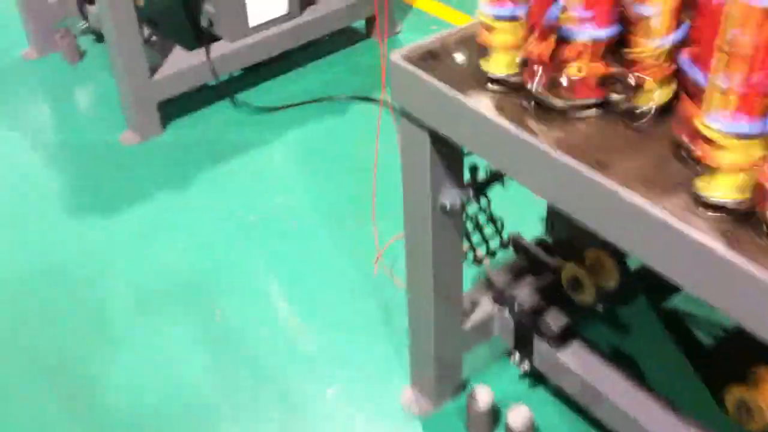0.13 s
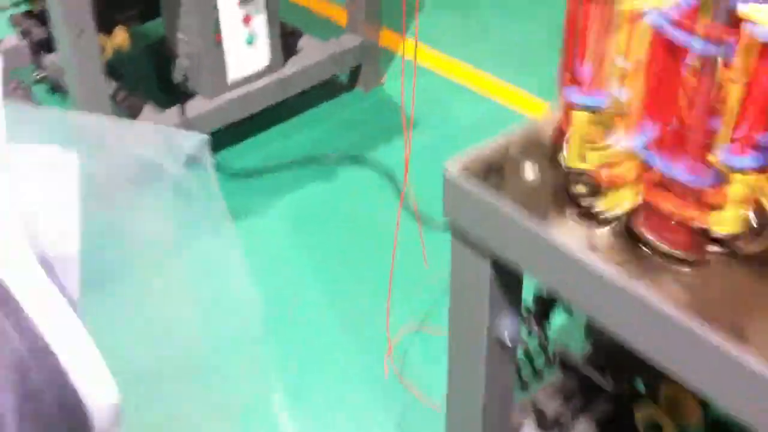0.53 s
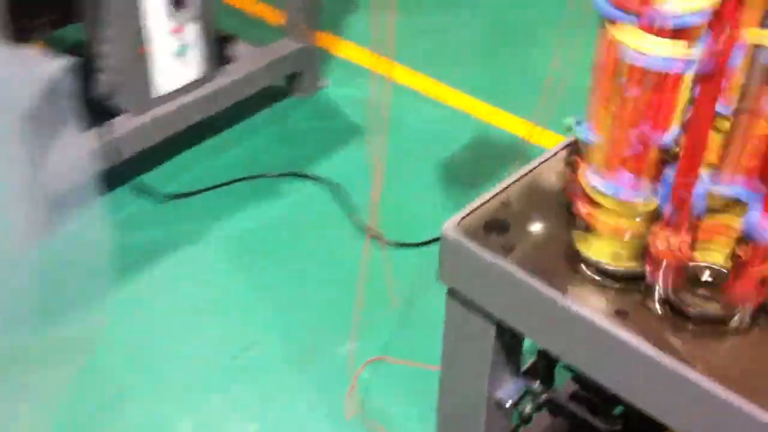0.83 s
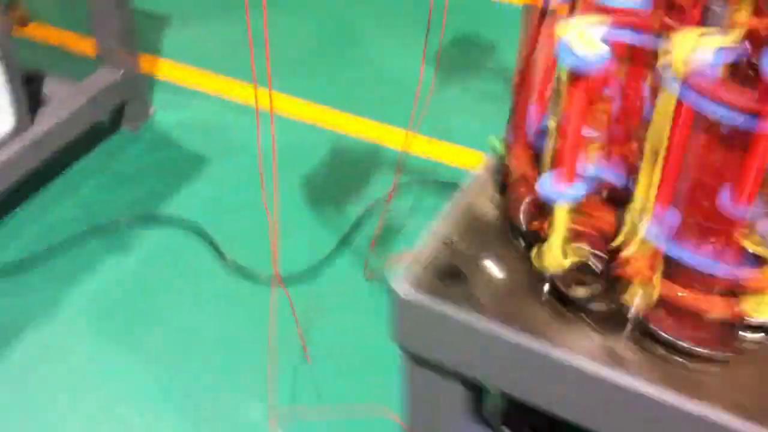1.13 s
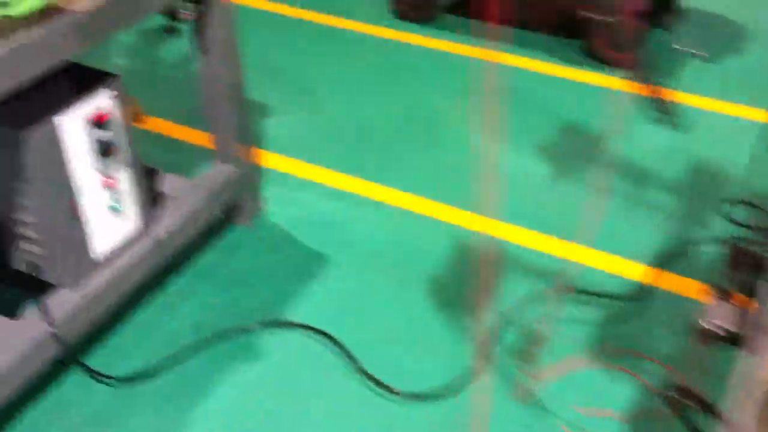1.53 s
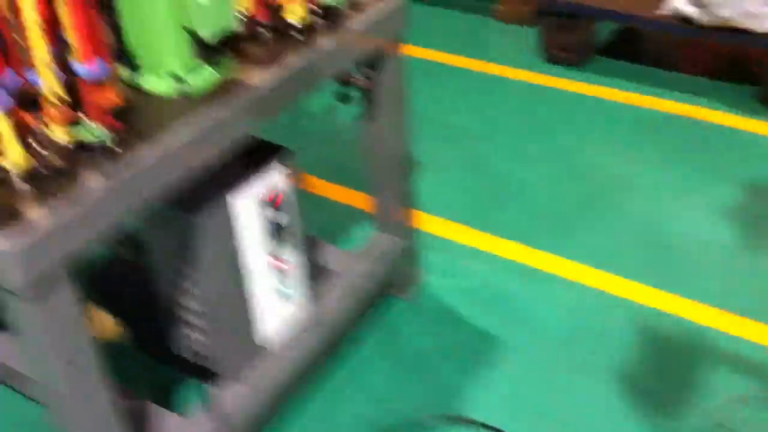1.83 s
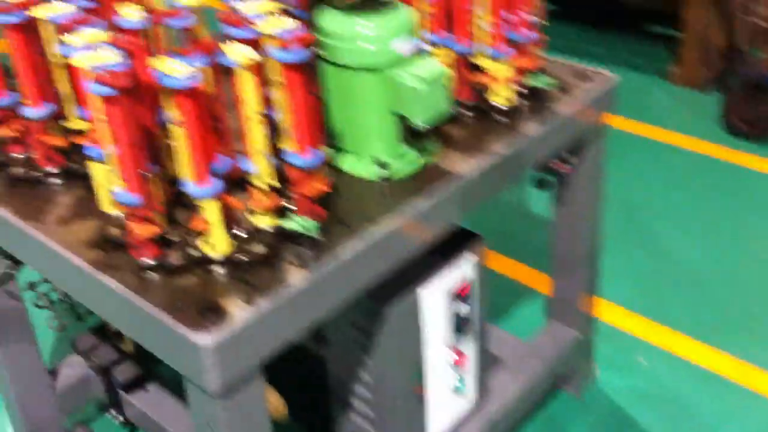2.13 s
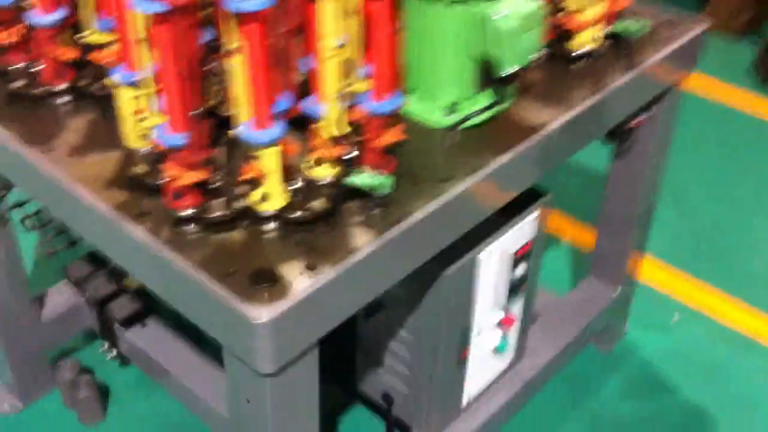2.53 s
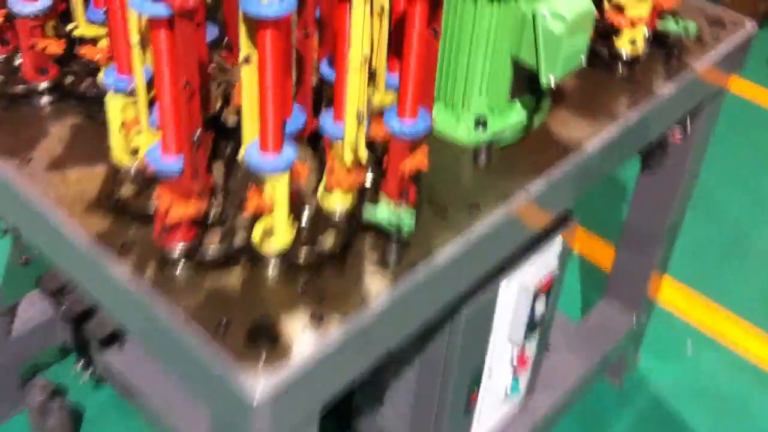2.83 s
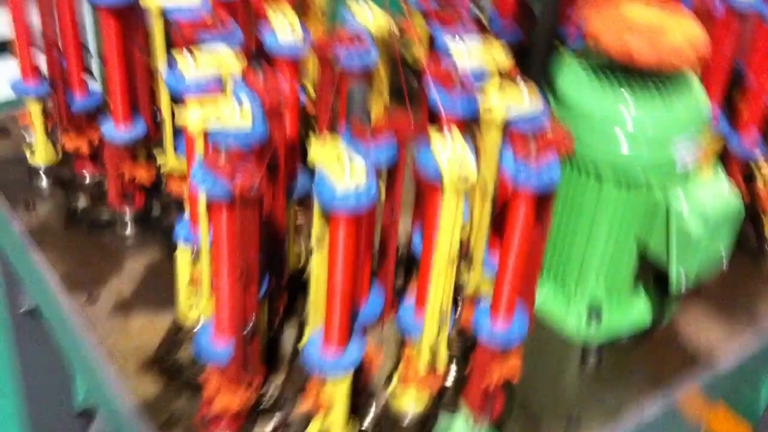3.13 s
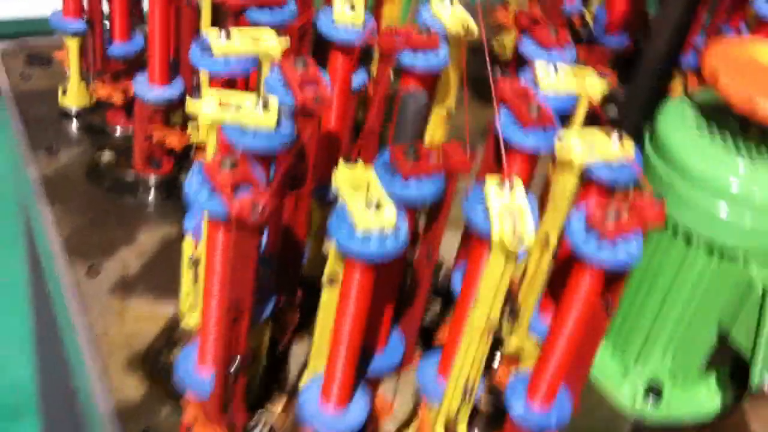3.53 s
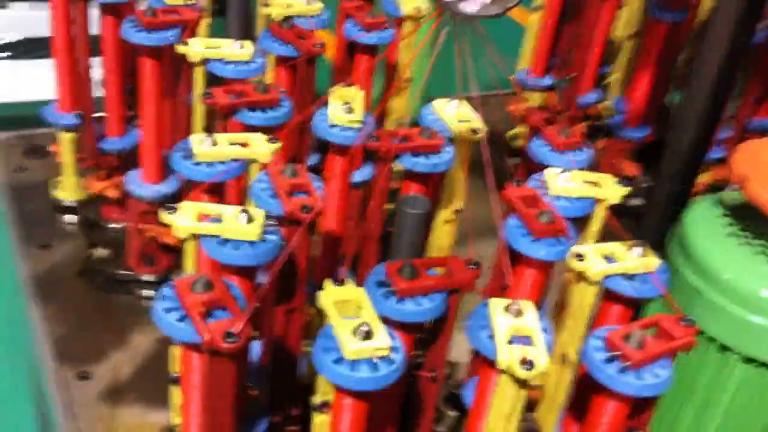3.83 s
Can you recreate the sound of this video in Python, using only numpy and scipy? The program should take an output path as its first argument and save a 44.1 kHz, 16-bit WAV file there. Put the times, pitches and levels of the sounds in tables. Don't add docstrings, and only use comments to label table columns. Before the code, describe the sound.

Braiding machine clatters loudly, stops at 1.5 seconds, leaving a quiet hall with scattered ticks

```python
import sys
import numpy as np
from scipy import signal
from scipy.fft import rfft, irfft
from scipy.io import wavfile

SR = 44100
rng = np.random.default_rng(int(sys.argv[2]) if len(sys.argv) > 2 else 0)


def magnitude_from_level(level_db):
    exponent = np.asarray(level_db, float) / 20
    return 10 ** exponent


def wav_record(signal):
    frames = np.transpose(np.atleast_2d(signal))
    bounded = np.clip(frames, -1, 1)
    quanta = np.round(bounded * 32767).astype(np.int16)
    wavfile.write(sys.argv[1], SR, quanta)


N = 176400
STOP_S = 1.5


def rms_one(x):
    return x / np.sqrt(np.mean(x ** 2) + 1e-20)


def curve(rows):
    rows = np.array(rows)
    return np.interp(np.arange(N) / SR, rows[:, 0], rows[:, -1])


def filtered(x, order, hz, kind):
    return signal.sosfilt(signal.butter(order, hz, kind, fs=SR, output="sos"), x)


def colour(x, points, peaks=()):
    hz = np.maximum(np.fft.rfftfreq(len(x), 1 / SR), 1)
    points = np.array(points)
    db = np.interp(np.log(hz), np.log(points[:, 0]), points[:, 1])
    for peak_hz, width_hz, peak_db in peaks:
        db = db + peak_db / (1 + (2 * (hz - peak_hz) / width_hz) ** 2)
    return rms_one(irfft(rfft(x) * magnitude_from_level(db), len(x)))


def drift(rate_hz):
    r = np.exp(-80 * np.pi * rate_hz / SR)
    noise = rng.standard_normal(N // 40 + 2002)
    slow = signal.lfilter([1], [1, -2 * r, r * r], noise)[2000:]
    return np.interp(np.arange(N) / 40, np.arange(len(slow)), rms_one(slow))


def sparse(length, rate_per_s):
    return (rng.random(length) < rate_per_s / SR) * rng.standard_normal(length)


def ring(clicks, hz, t60_s):
    r = magnitude_from_level(-60 / (t60_s * SR))
    w = 2 * np.pi * min(hz, .45 * SR) / SR
    return signal.lfilter([0, np.sin(w)], [1, -2 * r * np.cos(w), r * r], clicks + 1e-18)


def add(out, s, x):
    i = int(s * SR)
    out[i:i + len(x)] += x[:N - i]


def braider():
    # (time [s], level [dB])
    run = [(0, -22), (.4, -21.5), (.85, -19.5), (1.2, -18.5), (1.46, -19), (1.6, -25), (1.75, -30),
           (1.9, -39.5), (2.05, -49), (2.3, -60)]
    # (time [s], level [dB])
    drone = [(0, -1), (.15, 1), (.25, -2), (.55, -1), (.65, 1), (.8, 1), (.85, -1), (.9, 2), (1.1, 0),
             (1.26, -1), (1.4, 2), (1.54, 2), (1.575, -4), (1.61, 6), (1.66, 4), (1.69, -4), (1.72, 2),
             (1.86, -8)]
    slowing_per_s = 1.2
    after_s = np.maximum(np.arange(N) / SR - STOP_S, 0)
    speed = np.clip(1 - slowing_per_s * after_s, .05, 1)
    drone_db = curve(drone)
    out = coasting_treble(deck_clatter(speed), after_s)
    hum = filtered(out, 1, [180, 380], "band")
    out = out - hum * (1 - magnitude_from_level(drone_db))
    out += gear_tones(speed, after_s, drone_db)
    return out * magnitude_from_level(curve(run + [(2.8, -90)]))


def deck_clatter(speed):
    # (frequency [Hz], density [dB per Hz])
    clatter = [(35, -80), (60, -53.5), (200, -14), (255, -4), (537, -15), (837, -13), (1130, -15),
               (8420, -18), (15800, -29)]
    # (frequency [Hz], width [Hz], gain [dB])
    body = [(158, 45, 11), (280, 110, 4), (700, 184, 4), (1700, 430, 2.5), (2470, 260, 3), (3814, 450, 5),
            (5460, 1400, 3), (8700, 1300, 2)]
    knock_db, rattle_db, ping_db = -7, -4, -8.5
    wash = magnitude_from_level(knock_db) * speed ** 2 * carrier_knocks(speed)
    wash += magnitude_from_level(rattle_db) * rms_one(sparse(N, 2500))
    wash += magnitude_from_level(ping_db) * pings()
    wash += rng.standard_normal(N)
    swell_db = .5 * drift(4.8)
    return magnitude_from_level(3.5 + swell_db) * colour(wash, clatter, body)


def carrier_knocks(speed):
    # (share of the pass [0..1], level [dB])
    contacts = [(0, 3), (.25, 0), (.5, 0), (.75, 0), (.02, 2), (.22, -1), (.42, -1), (.62, -1), (.82, -1)]
    turn_hz, knock_s, spread_db, jitter_turns = 22.63, .002, 3, .006
    turns = np.cumsum(turn_hz * speed / SR)
    hits = np.zeros(N)
    draw = rng.standard_normal((100, len(contacts), 2))
    for k, (share, db) in enumerate(contacts):
        at = np.searchsorted(turns, np.arange(100) + share + jitter_turns * draw[:, k, 0])
        hits[np.minimum(at, N - 1)] = magnitude_from_level(db + spread_db * np.clip(draw[:, k, 1], -2, 1.3))
    decay = np.exp(-1 / (knock_s * SR))
    return rms_one(signal.lfilter([1], [1, -decay], hits) * rng.standard_normal(N))


def pings():
    taps_per_s, ring_cycles = 900, 104
    taps = sparse(N, taps_per_s)
    pitches_hz = 700 * 22 ** rng.random(40)
    dealt = rng.integers(0, 40, N)
    out = np.zeros(N)
    for k, hz in enumerate(pitches_hz):
        out += ring(taps * (dealt == k), hz, ring_cycles / hz) * np.sqrt(hz)
    return rms_one(out)


def coasting_treble(x, after_s):
    # (time [s], level over the clatter [dB])
    clanks = [
        (1.544, 4),
        (1.59, 6.5),
        (1.675, 8.5),
        (1.75, 7),
        (1.825, 2),
    ]
    fade_db_per_s, clank_s = 11.5, .012
    t = np.arange(N) / SR
    clank_db = sum(db * np.exp(-np.abs(t - s) / clank_s) * (t > s) for s, db in clanks)
    treble = x - filtered(x, 1, 3000, "low")
    return x - treble * (1 - magnitude_from_level(-fade_db_per_s * np.minimum(after_s, .5) + clank_db))


def gear_tones(speed, after_s, drone_db):
    tone_hz = [203.6, 248.5, 283, 849, 955]
    # (level re clatter [dB], wander [Hz])
    tones = [(-17, 1.0), (-5, 2.8), (-9.5, 8.0), (-12, 2.0), (-19.5, 2.0)]
    fade_db_per_s = 37
    out = np.zeros(N)
    for hz, (db, wander_hz) in zip(tone_hz, tones):
        pitch_hz = hz * (1 - .06 * (1 - speed)) + wander_hz * drift(4.93)
        level_db = db + 2.5 + 1.6 * drift(8.2) - fade_db_per_s * after_s * hz / 850
        level_db = level_db + drone_db * (hz < 400)
        out += magnitude_from_level(level_db) * np.sin(2 * np.pi * np.cumsum(pitch_hz) / SR)
    return out


def ticks():
    # (time [s], peak [dB], low edge [Hz], high edge [Hz], decay [s])
    tick_rows = [(2.003, -31, 3000, 9600, .001), (2.063, -26, 900, 8900, 0.00052),
                 (2.077, -28, 900, 6500, .0007), (2.1003, -25, 2000, 13000, .0007),
                 (2.107, -34, 3000, 7000, .001), (2.15, -30, 2500, 5500, 0.00077),
                 (2.2368, -27, 1500, 6960, 0.00076), (2.241, -31, 1500, 5960, 0.0011),
                 (2.315, -33, 1800, 5000, .001), (2.325, -29, 5000, 13000, .001),
                 (2.375, -37, 1200, 4000, .001), (2.384, -31.5, 700, 4500, .001),
                 (2.5188, -24, 1700, 3600, .0004), (2.68, -30, 600, 13800, 0.00075),
                 (2.7265, -26, 1500, 8000, 0.00093), (2.795, -33, 1200, 4430, 0.0013),
                 (2.8518, -19, 1400, 3100, .0016), (2.9635, -27, 2500, 8000, .0009),
                 (2.976, -26, 700, 2200, .002), (3.014, -36, 4000, 14000, .001),
                 (3.143, -28, 800, 6900, 0.0016), (3.2112, -24, 1500, 6000, .0007),
                 (3.434, -43, 3000, 6500, 0.00091), (3.935, -42, 8000, 15000, .001),
                 (2.329, -37, 8000, 15000, .001), (2.397, -36, 2500, 12000, .001),
                 (2.411, -37, 1500, 5000, .001), (2.852, -36, 7000, 10500, .001),
                 (2.855, -31, 3000, 5500, .001), (2.964, -36, 10000, 15500, .001),
                 (3.5425, -32, 3400, 5000, .0015), (3.547, -29, 3400, 5000, .0015),
                 (3.5525, -29, 4500, 6200, .002), (3.596, -31, 1500, 7000, .001)]
    tilt_hz = 2500
    out, t = np.zeros(N), np.arange(1024) / SR
    for s, db, low_hz, high_hz, decay_s in tick_rows:
        crackle = .25 * np.exp(-t / max(decay_s, 1e-4)) + magnitude_from_level(-26) * np.exp(-t / .0045)
        burst = rng.standard_normal(1024) * crackle
        burst[[0, int(decay_s * SR), int(2.3 * decay_s * SR)]] = 2, -.35, .15
        burst = filtered(burst, 1, max(tilt_hz, low_hz), "low")
        tick = filtered(burst, 3, [low_hz, min(high_hz, 18000)], "band")
        add(out, s, magnitude_from_level(db) * tick / np.abs(tick).max())
    return out


def snap():
    # (frequency [Hz], level [dB], t60 [s])
    modes = [(1300, -23, .005), (2200, -23, .004), (3300, -23, .004), (4800, -16.5, .005),
             (6000, -32, .003), (7950, -13, .003), (11900, -29, .004)]
    snap_s, rebound_s = 3.2102, .0012
    clicks = np.zeros(N)
    clicks[[int(snap_s * SR), int((snap_s + rebound_s) * SR)]] = 1, magnitude_from_level(-12)
    rings = sum(magnitude_from_level(db) * ring(clicks, hz, t60_s) for hz, db, t60_s in modes)
    return filtered(rings, 2, [900, 12500], "band")


def thuds():
    # (time [s], peak [dB], pitch [Hz])
    thud_rows = [(2.236, -32, 563), (2.274, -38, 315), (2.384, -27, 605), (2.398, -29, 700),
                 (2.424, -29, 270), (2.681, -31, 500), (2.793, -32, 405), (2.853, -29, 300),
                 (2.981, -21, 620), (3.141, -29, 580), (3.595, -26.5, 630), (3.7535, -25, 400),
                 (3.766, -33, 330), (3.830, -30, 430), (3.866, -32, 300), (2.244, -33, 400),
                 (2.411, -33, 600), (2.965, -33, 700), (3.008, -32, 550), (3.578, -33, 400)]
    out = np.zeros(N)
    for s, db, hz in thud_rows:
        push = .15 * rng.standard_normal(4096) * np.exp(-np.arange(4096) / (.0011 * SR))
        push[0] = 2
        rings = ring(push, hz, 9.5 / hz)
        rings -= .45 * ring(push, 1.56 * hz, 7.2 / hz)
        rings += .25 * ring(push, 2.82 * hz, 2.9 / hz)
        add(out, s, magnitude_from_level(db) * rings / np.abs(rings).max())
    return filtered(out, 3, 130, "high")


def puffs():
    # (time [s], rms [dB], hold [s], t60 [s], centre [Hz])
    puff_rows = [(2.3, -62, .04, .2, 12000), (2.385, -51, .025, .27, 2500), (2.727, -53, .016, .15, 3000),
                 (2.942, -42, .018, .3, 6000), (2.947, -44.5, .05, .5, 895), (3.539, -43, .04, .5, 3300),
                 (3.6, -53, .06, 1.2, 2500), (3.545, -47, .07, .65, 7500), (3.936, -57.5, .04, .3, 11000),
                 (3.55, -41.5, .025, .5, 4600), (3.0, -53, .03, .3, 5000), (2.385, -60, .04, .2, 10000),
                 (1.58, -63, .15, .5, 90), (1.9, -65, .05, .4, 60), (2.48, -53, .33, .4, 170)]
    # (frequency [Hz], width [Hz], gain [dB])
    pipe_rings = [(2690, 300, 4), (4200, 400, 4), (5370, 400, 5)]
    rise_s, octaves, grit_per_s, grit_db = .004, 1.1, 900, -7
    edge = 2 ** (2 * octaves)
    out, t = np.zeros(N), np.arange(SR) / SR
    for s, db, hold_s, t60_s, hz in puff_rows:
        grit = magnitude_from_level(grit_db) * rms_one(sparse(SR, grit_per_s))
        flow = rng.standard_normal(SR) * magnitude_from_level(1.6 * drift(150)[:SR])
        spectrum = [(hz / edge / 4, -40), (hz / edge, -14), (hz, 0), (hz * edge, -20), (hz * edge * 1.5, -34)]
        hiss = colour(grit + flow, spectrum, pipe_rings)
        level_db = db - 60 * np.maximum(t - hold_s, 0) / t60_s
        add(out, s, hiss * np.minimum(t / rise_s, 1) * magnitude_from_level(level_db))
    return out


def drive_whine():
    whine = [(1.9, 8004, -61), (2.36, 7998, -51), (2.83, 8004, -57.5), (2.88, 8004, -44), (2.92, 7993, -58),
             (3.22, 8014, -50), (3.24, 8004, -73), (3.37, 8003, -53.5), (3.39, 8010, -68),
             (3.43, 8003, -54), (3.5, 8001, -72), (3.52, 8004, -51), (3.61, 7993, -63), (3.63, 7998, -62),
             (3.74, 8001, -56), (3.85, 8001, -65), (3.95, 7998, -48.5), (4.0, 8010, -52)]
    pitch_hz = 8001 + 3.1 * drift(3.6)
    level_db = curve(whine) + 5 + 3.2 * drift(15)
    return magnitude_from_level(level_db) * np.sin(2 * np.pi * np.cumsum(pitch_hz) / SR)


def hall():
    # (frequency [Hz], level [dB])
    far_spectrum = [(45, -33), (90, -21), (150, -3), (250, -3), (700, -9), (1900, -15), (2500, -24),
                    (7000, -33.5)]
    # (frequency [Hz], level [dB])
    air_spectrum = [(5000, -8), (8000, 5), (11000, -0.5), (14000, -1), (16000, -9)]
    far_db, air_db = -44.5, -63
    far = magnitude_from_level(far_db + drift(1)) * colour(rng.standard_normal(N), far_spectrum + [(10000, -60)])
    air = magnitude_from_level(air_db) * colour(rng.standard_normal(N), [(2000, -42)] + air_spectrum)
    return far + air


def scene():
    machine = braider()
    events = ticks() + snap() + thuds() + puffs()
    background = drive_whine() + hall()
    return np.tile(machine + events + background, (2, 1))


def top_cut(x):
    return signal.sosfilt(signal.butter(12, 15980, fs=SR, output="sos"), x)


def record(dry):
    limit = .89
    cut = filtered(dry, 1, 30, "high")
    return top_cut(limit * np.tanh(cut / limit))


dry = scene()
out = record(dry)
wav_record(out)
```